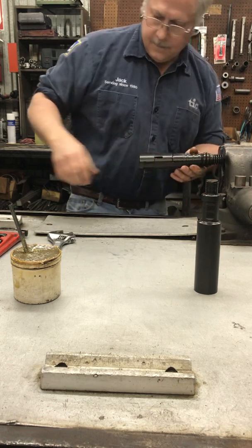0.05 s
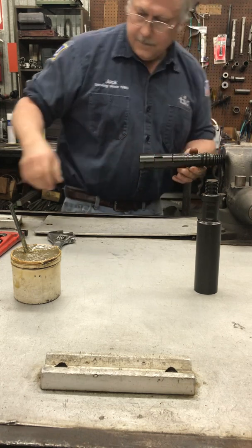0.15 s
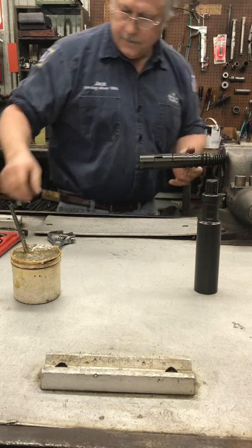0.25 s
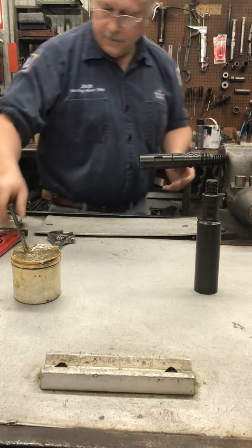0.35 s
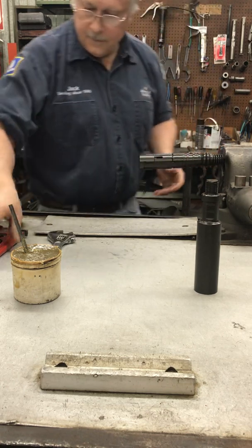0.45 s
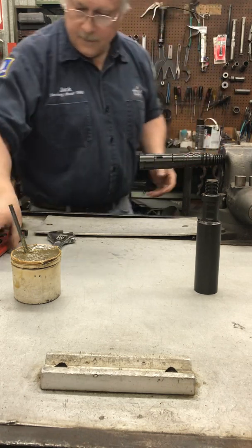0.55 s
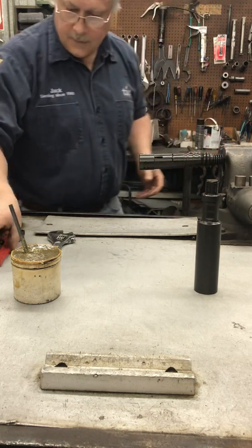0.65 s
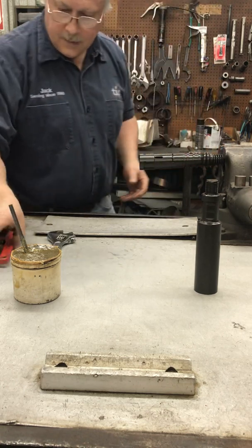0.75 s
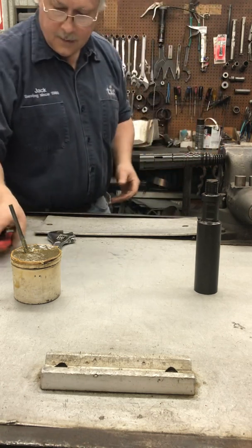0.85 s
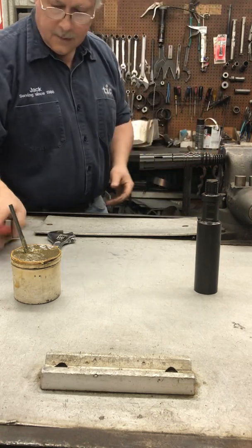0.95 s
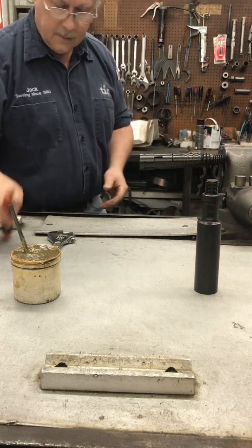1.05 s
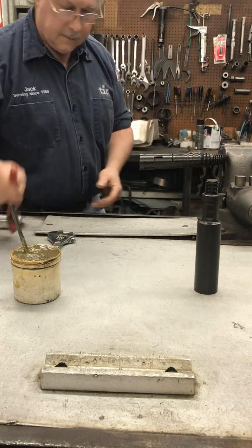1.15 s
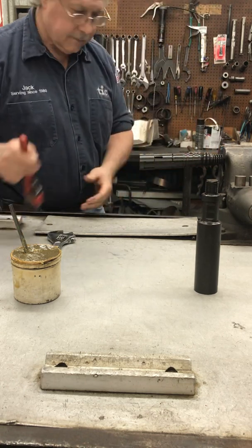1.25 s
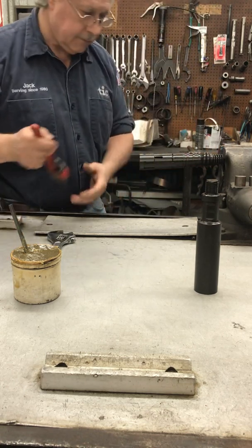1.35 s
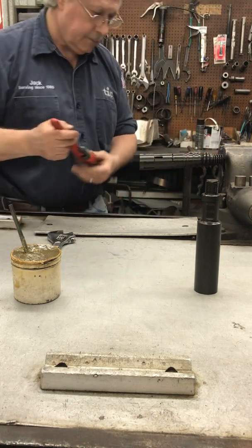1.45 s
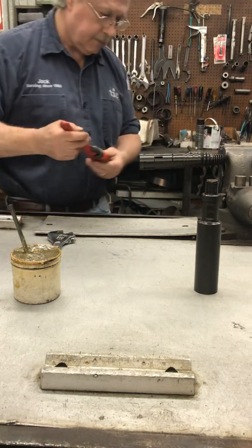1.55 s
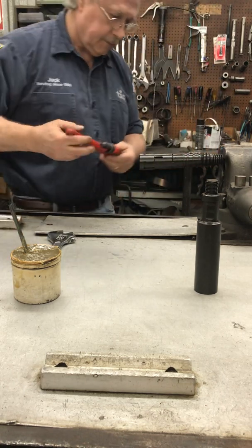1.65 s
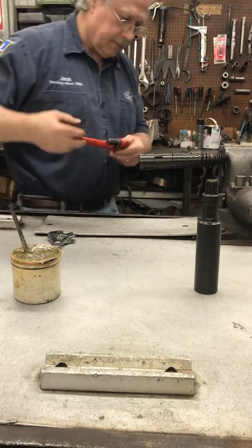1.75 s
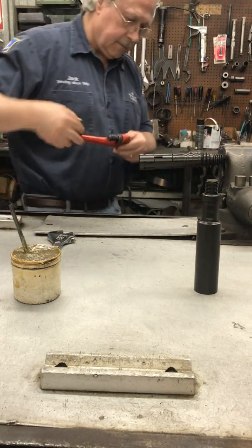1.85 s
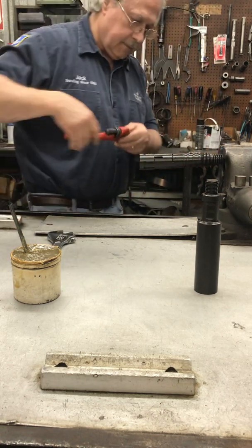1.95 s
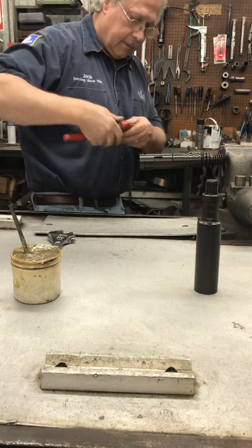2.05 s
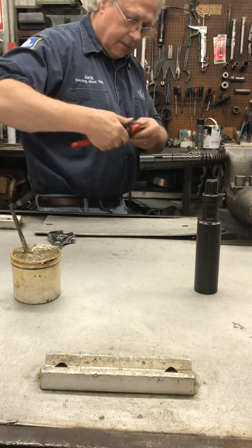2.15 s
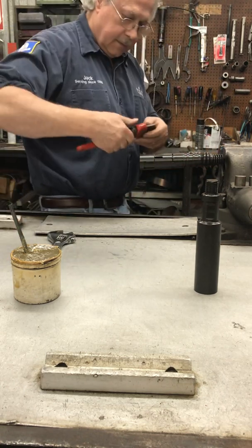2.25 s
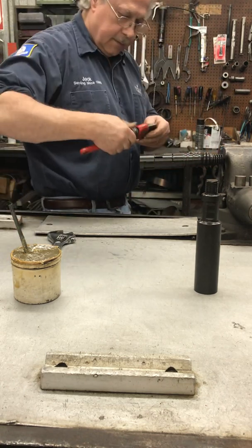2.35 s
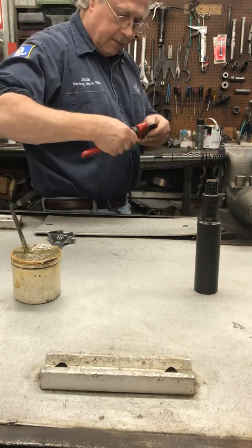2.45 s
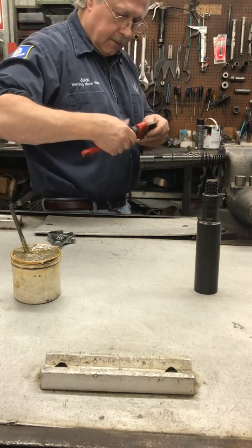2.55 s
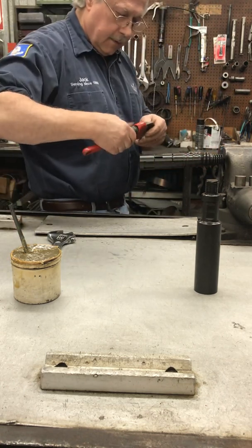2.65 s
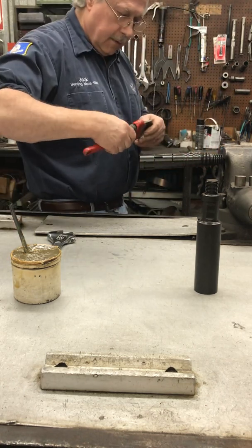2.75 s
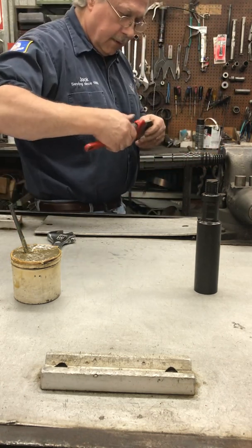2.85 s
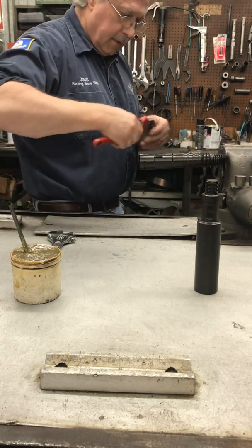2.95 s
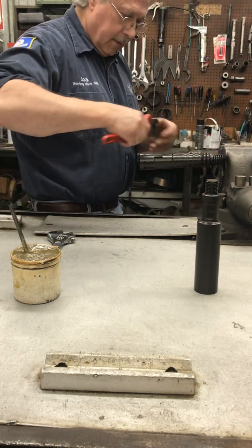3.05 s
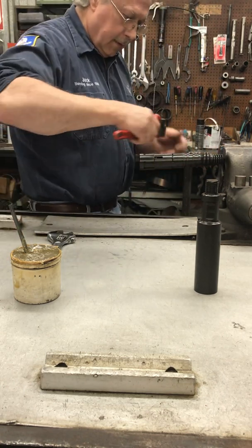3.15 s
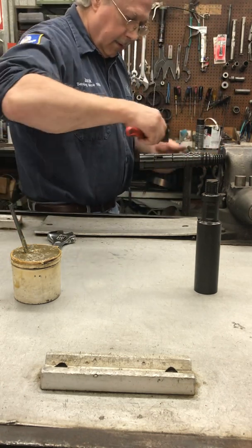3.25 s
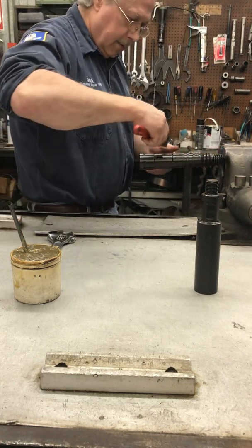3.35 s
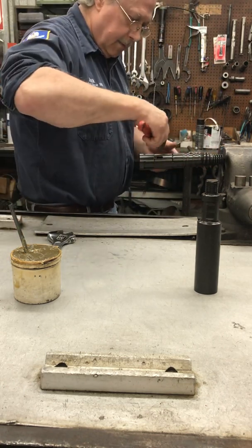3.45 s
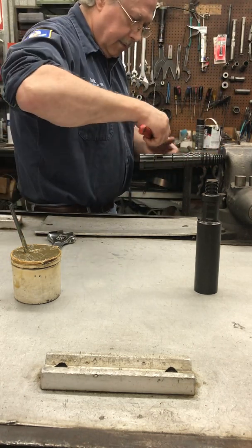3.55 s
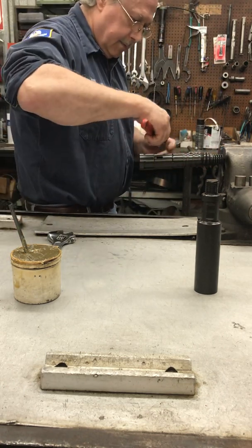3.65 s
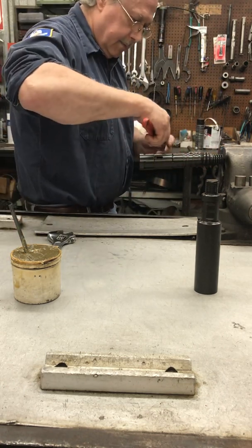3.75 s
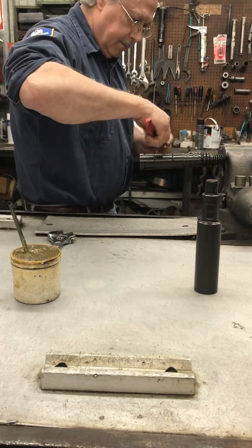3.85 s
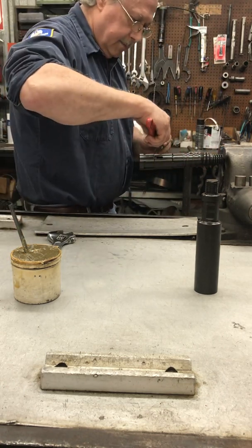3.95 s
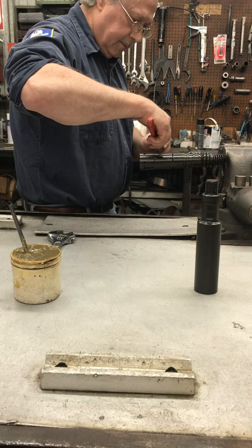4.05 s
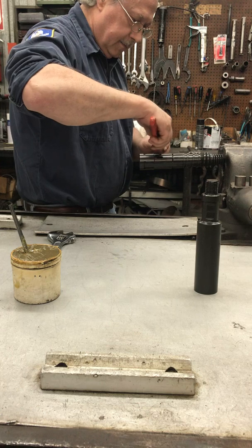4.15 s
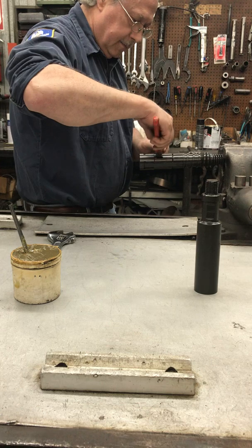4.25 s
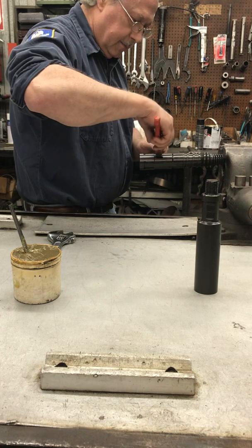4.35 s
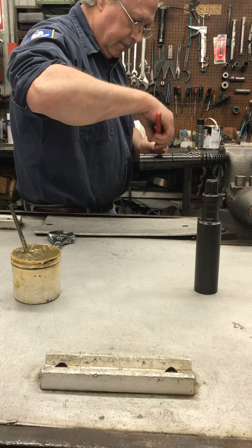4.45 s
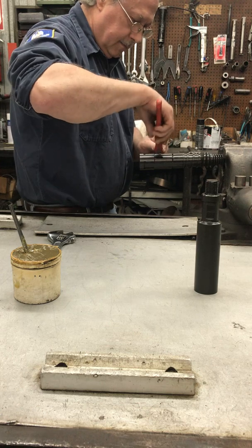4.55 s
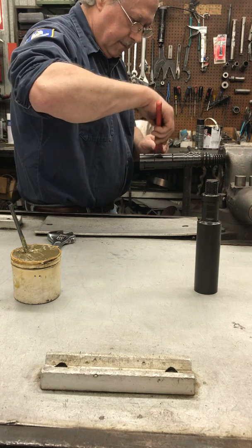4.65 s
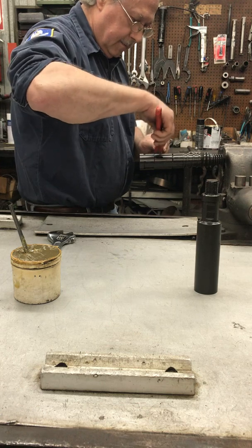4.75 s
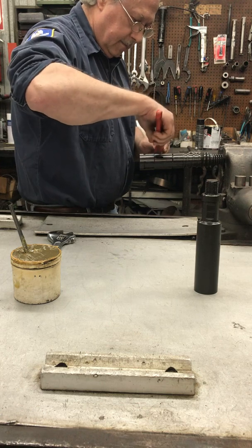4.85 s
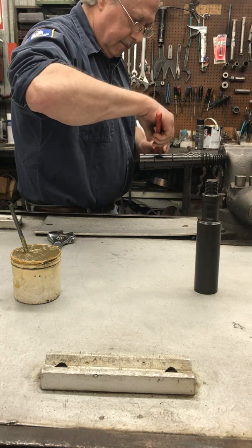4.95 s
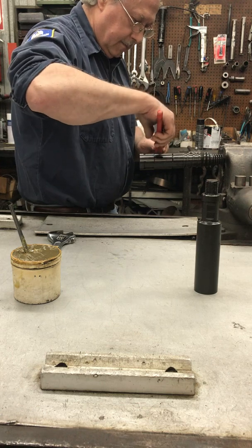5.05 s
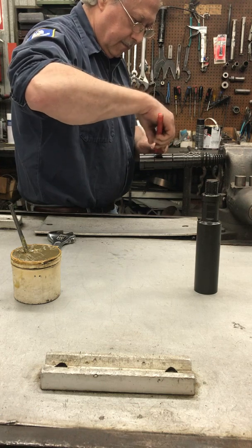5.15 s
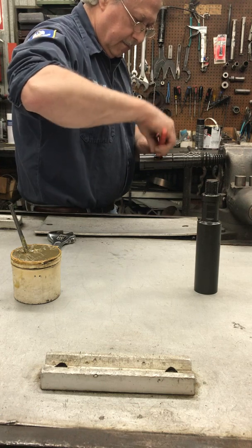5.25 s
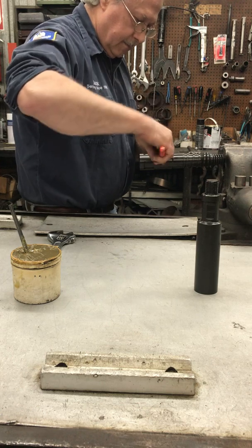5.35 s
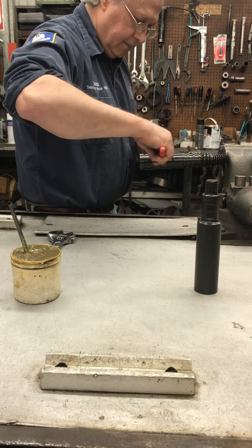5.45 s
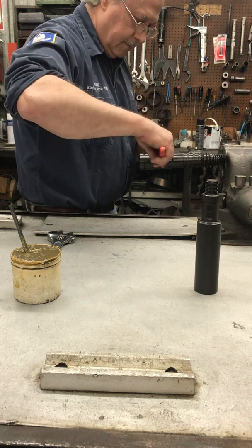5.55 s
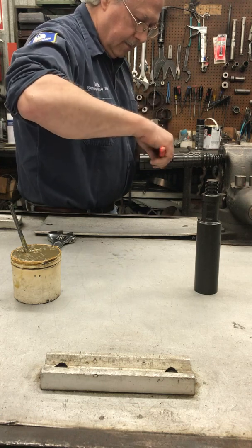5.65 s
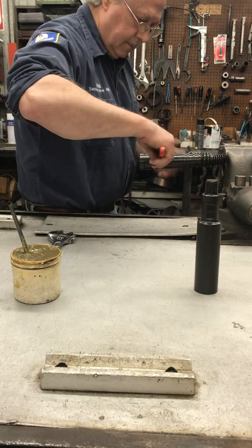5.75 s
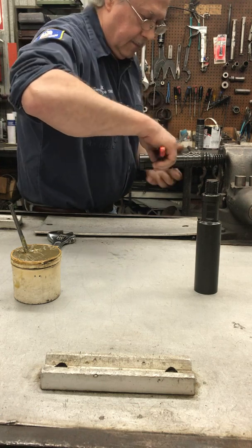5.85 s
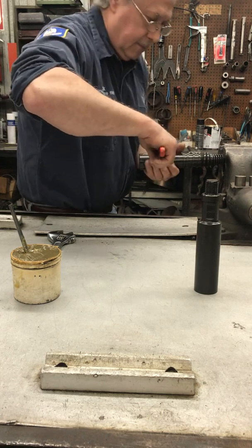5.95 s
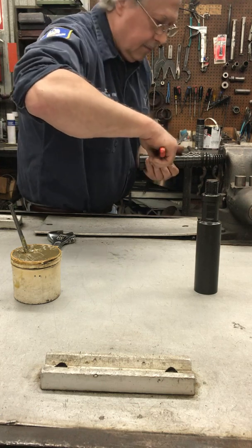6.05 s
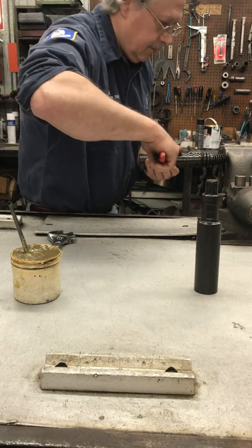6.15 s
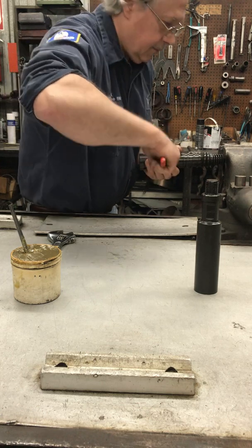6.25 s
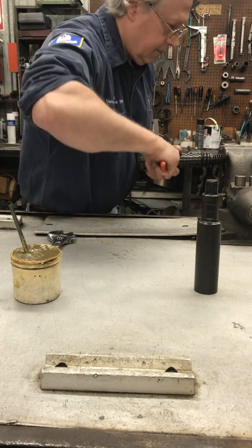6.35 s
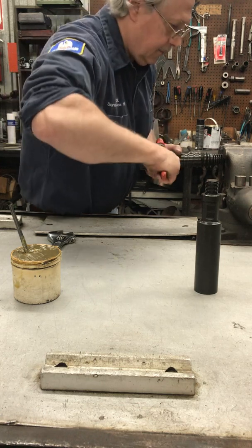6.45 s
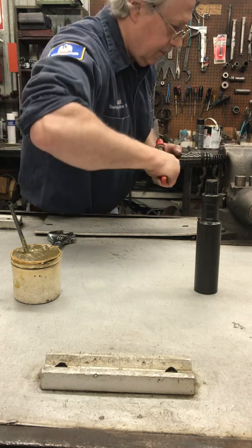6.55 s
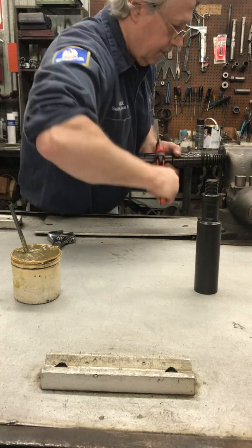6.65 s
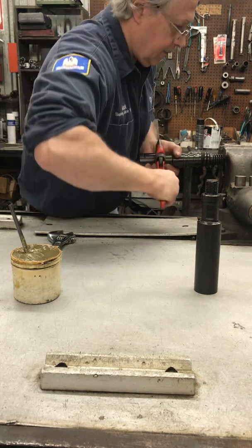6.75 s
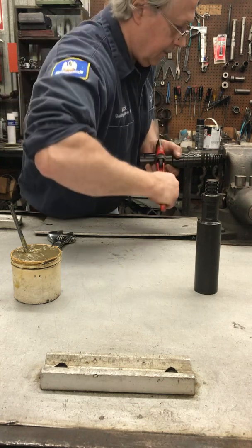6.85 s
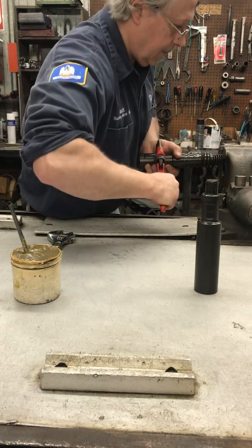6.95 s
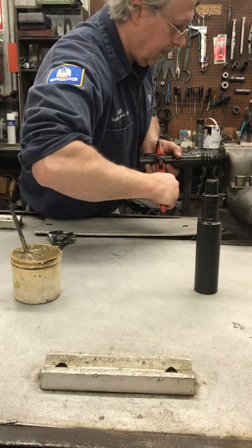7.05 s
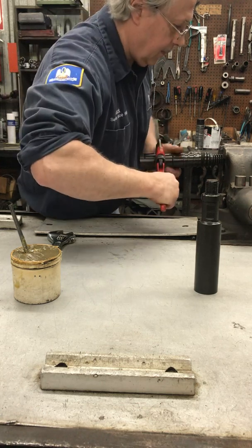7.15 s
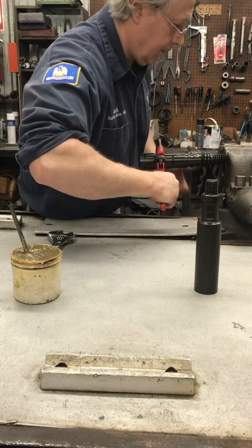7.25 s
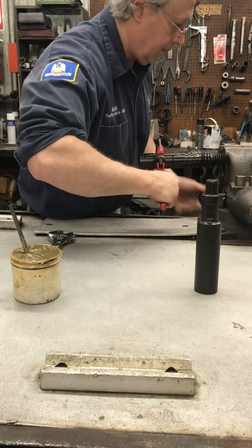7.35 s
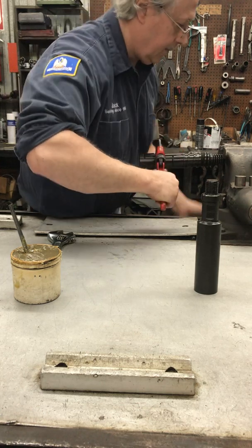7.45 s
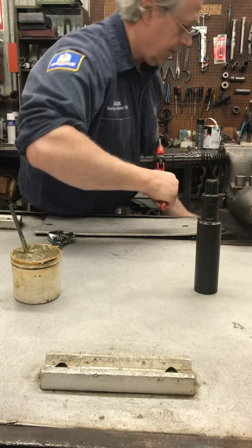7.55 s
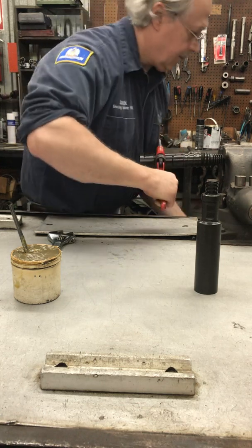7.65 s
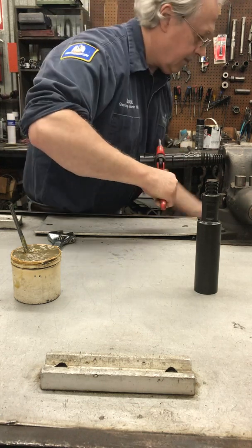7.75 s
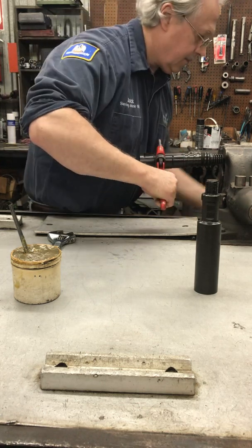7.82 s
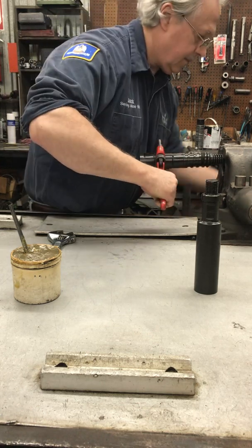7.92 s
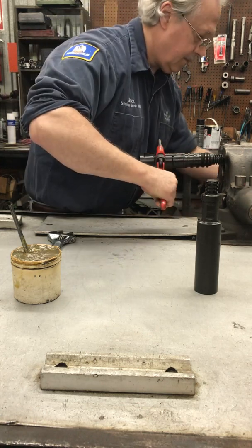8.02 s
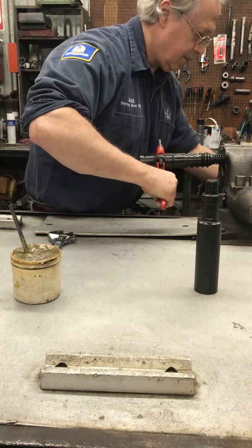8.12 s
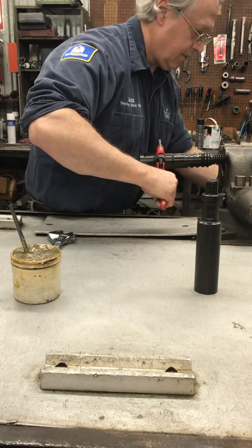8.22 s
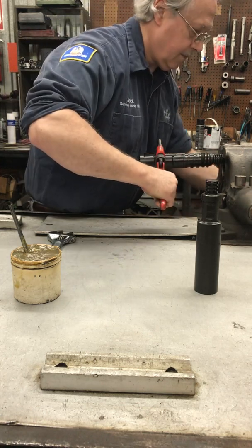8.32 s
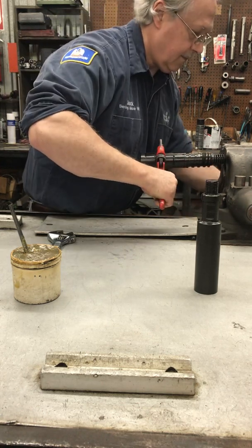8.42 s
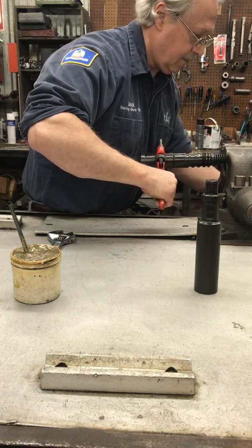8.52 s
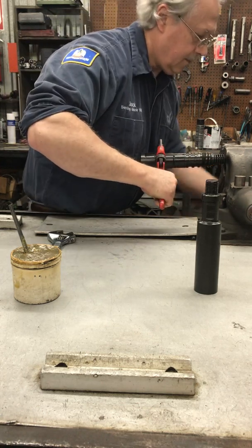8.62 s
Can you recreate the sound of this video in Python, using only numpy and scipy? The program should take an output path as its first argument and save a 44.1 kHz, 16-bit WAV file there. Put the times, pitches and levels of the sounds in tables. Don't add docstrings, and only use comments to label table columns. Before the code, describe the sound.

Close in a humming workshop, a heavy tool scrapes off a steel-topped bench with two clattering bangs, the second loudest. Loose metal clacks right after, then small bright clinks and muffled handling bumps come in uneven groups as the wrench meets a held pipe. The jaw bites with a short damped crack, then near silence but for fan rumble, faint rapid ticking and a soft bench thud. Short, faint room echo.

```python
import sys
import numpy as np
from scipy import signal
from scipy.fft import rfft, irfft
from scipy.io import wavfile
from scipy.ndimage import uniform_filter1d

SR = 44100
rng = np.random.default_rng(int(sys.argv[2]) if len(sys.argv) > 2 else 0)


def voltage_ratio(decibels):
    exponent = np.asarray(decibels, float) / 20
    return 10 ** exponent


def generate_wav(sig):
    pcm = np.round(np.clip(np.atleast_2d(sig).T, -1, 1) * 32767).astype(np.int16)
    wavfile.write(sys.argv[1], SR, pcm)


N = 382788

# pitch_hz, level_db, width_hz
HUM = [(57.8, -45.5, 5), (115.7, -50.5, 9.2), (207.2, -53, 4.6), (357, -66.5, 1.4), (1364, -72, 1.5),
       (1055, -75, 9.7)]
# pitch_hz, level_db (per Hz)
RUMBLE = [(20, -27.5), (38, -12.5), (52, 1), (62, -0.5), (86, -3), (125, -5), (178, -12.5), (209, -6),
          (238, -15.5), (319, -23), (350, -21), (468, -31), (520, -46.5), (680, -58), (1140, -120)]
# pitch_hz, level_db (per Hz)
HISS = [(260, -28), (450, -16), (515, -0.5), (748, -6.5), (1070, -9), (1150, -7.5), (1340, -6.5),
        (1860, -5.5), (2230, -13), (3140, -13.5), (4840, -20), (6730, -23), (10200, -35.5), (11300, -29),
        (16000, -33.5)]
# time_s, level_db
HISS_LEVEL = [(0, -55.5), (.45, -56.5), (1.6, -57), (5.5, -57.5), (8.68, -57)]

# pitch_hz, level_db, t60_s
FADING = [(2660, -48, 0.17), (3994, -51.5, 0.29), (4030, -54, 0.17), (4285, -59, 0.18), (5050, -65, .2),
          (1720, -55, .12), (5910, -64, .2)]
# pitch_hz, level_db, t60_s
PING = [(7100, -51, 0.13), (7090, -58.5, .14), (12830, -65.5, .08)]
PING_S = 0.639

# first_s, period_s
FAST_TIMES = (.0300, .050005)
SLOW_TIMES = (.0678, .102334)
# pitch_hz, level_db
FAST_TICK = [(4000, -22.5), (6200, 0), (7400, -17.5), (8800, -2.5), (10300, -18), (11700, 0),
             (13600, -14.5), (15000, -9.5)]
SLOW_TICK = [(1500, -30), (2900, 9.5), (3800, -4), (4900, -8), (6400, 5), (7600, -15.5), (9000, -16),
             (13000, -21), (15000, -12)]
SPARK = [(9000, -30), (13000, -12), (14500, 5), (16000, -6)]
SPARKS = [1, 2, 5, 13, 14, 16, 17, 19, 23, 25, 29, 31, 34, 35, 37, 38, 43, 45, 46, 48, 55, 58, 61, 63, 66,
          67, 69, 70, 72, 75, 79, 82, 83]

# start_s, level_db
DRY_CRACKS = [(0.302, -51), (1.0642, -44), (1.582, -45), (2.3890, -38.5), (2.423, -39), (2.907, -40),
              (3.523, -42), (4.143, -44), (4.765, -44), (4.788, -32), (4.8050, -19), (5.3120, -34),
              (5.3428, -27), (5.3525, -31), (5.4237, -39.5), (5.2964, -33), (5.9335, -49), (7.983, -45)]
# pitch_hz, level_db
CRACK_BODY = [(900, -18.5), (2020, -8.5), (2700, -5), (3300, 2.5), (4000, -8), (5200, -12), (6200, -35),
              (9000, -59.5)]
CRACK_TOP = [(3500, -36.5), (5500, 2), (7000, -0.5), (9000, -8), (12000, -12.5), (16000, -17.5)]
CRACK_TOP_DB = [-14, -20, -15, -21, -15, -16, -11, -11.5]
HARDER = 0.17

# peak_s, level_db, rise_s, fall_s, grit_db
DRAGS = [(0.503, -44, 0.008, 0.068, -7), (.526, -36, 0.03, 0.036, -20), (0.57, -42, .012, 0.21, -6),
         (0.636, -26, 0.008, 0.06, -14), (.622, -41, .05, .015, -4), (.900, -21, .004, 0.042, -19),
         (.915, -39, .006, 0.25, -17), (0.999, -46, .01, 0.023, -15), (1.066, -39.5, 0.025, 0.039, -15),
         (5.312, -45, 0.022, 0.042, -6), (5.352, -48, 0.017, 0.056, -18)]
# pitch_hz, level_db (per Hz)
RUB = [(250, -16), (400, -7.5), (620, -2), (1000, -5), (1900, -5), (2450, -11), (3300, -6), (4600, -4.5),
       (5400, -13), (6500, -27), (9500, -48)]
SLIP_SPREAD_DB, SLIPS_PER_S, RUB_SHARE = 2.5, 1800, 0.9
RUB_DAMP_S = 0.01
RUB_RING_DB = -14.5
SWELL_DB = 20

# start_s, level_db
SNAPS = [(.5103, -36.5), (.5150, -35), (.5200, -32.5), (0.525, -33), (0.5580, -25), (0.603, -28),
         (0.6276, -10), (0.8797, -1.5), (0.8863, 1), (.8884, -3), (.9990, -30), (1.057, -36), (1.0624, -34),
         (1.069, -34)]
# pitch_hz, level_db, t60_s
SNAP_MODES = [(2030, -6.5, 0.02), (3200, -8, 0.0078), (3900, -2, .009), (4180, 2, 0.0088),
              (4520, -1, 0.0065), (5150, -12, .006)]
# start_s, body_db, boom_db, edge_db
KNOCKS = [
    (0.559, -46, -46, -36),
    (0.605, -33.5, -31, -33.5),
    (.628, -20, -18, -24),
    (.637, -31, -20, -50),
    (.8803, -5.5, -16, -15),
    (.8815, -20, -6.5, -30),
    (0.8868, -8, -5.5, -12.5),
    (.8886, -13, -11, -17),
    (0.898, -19.5, -20.5, -42),
    (0.999, -26.5, -28, -35),
]
# pitch_hz, level_db (per Hz)
BENCH = [(250, -20), (390, -7), (500, -15.5), (615, 0), (760, -7.5), (960, -5.5), (1250, -7), (1580, -4.5),
         (2000, -4.5), (2300, -18.5), (3200, -4.5), (4100, -7), (4800, 0), (5800, -24), (9000, -55.5)]
# pitch_hz, t60_s
BENCH_T60 = [(300, 0.23), (520, .09), (700, 0.069), (1100, 0.058), (2000, 0.05), (2600, 0.06), (6000, .02)]
# pitch_hz, level_db (above the rest)
BENCH_NOTES = [(621, 8), (857, 2.5), (973, 10), (1089, 14), (1191, 8.5), (1396, 10), (1590, 10),
               (1797, 5.5), (2024, 9.5), (3516, -1.5), (3850, 8), (3980, -4), (4115, 7.5), (4443, 4.5)]
CEILING = 0.95

# peak_s, level_db, rise_s, fall_s
BUMPS = [(.632, -38.5, 0.0318, 0.1), (2.089, -46.5, 0.013, 0.13), (4.203, -44, 0.0052, 0.045),
         (4.810, -53.5, 0.1, 0.24), (5.298, -40, 0.0093, 0.076), (5.350, -52, .03, 0.043),
         (5.930, -53, 0.046, .06), (8.241, -40.5, 0.039, 0.1), (8.320, -70, 0.075, 0.033),
         (8.386, -50, 0.025, 0.025), (8.679, -40.5, 0.012, .03)]
# pitch_hz, level_db
BUMP = [(150, -14), (280, 0), (700, -5.5), (1200, -7), (2000, -19), (3500, -27), (6000, -47)]

# start_s, crack_db, ring_db
ON_LOOSE = [
    (1.0934, -20, -50),
    (1.0964, -17, -42),
    (1.6092, -34, -67),
]
ON_SHANK = [
    (1.1044, -17.5, -31.5),
    (1.686, -24.5, -56.5),
    (3.4795, -40, -66),
    (3.5344, -57, -40),
    (3.5454, -55, -38.5),
    (3.7637, -35, -50),
    (3.7775, -20, -40),
]
ON_NUT = [
    (0.828, -37, -67.5),
    (2.3167, -38.5, -67),
    (2.3963, -53, -62),
    (2.7138, -17, -37),
    (2.7223, -19, -55),
]
ON_JAW = [
    (2.6888, -30, -59),
    (2.9538, -48, -62.5),
    (3.5161, -18.5, -44),
    (3.798, -55, -60),
    (3.851, -24, -48),
    (4.606, -36.5, -65),
    (4.834, -55, -57),
]
ON_PIPE = [
    (2.9583, -31, -60),
    (3.8634, -46, -61),
    (4.2013, -44, -45),
    (4.7971, -26, -38),
    (4.8108, -20.5, -38),
    (4.8295, -55, -38.5),
    (4.977, -57, -67),
    (8.6135, -55, -63.5),
]
ON_THREAD = [
    (2.6890, -60, -57),
    (3.481, -60, -63),
    (4.798, -60, -35),
    (4.8295, -60, -43),
]
ON_HEAD = [
    (.8860, -26.5, -35.5),
    (0.889, -21, -33.5),
    (.8960, -32.5, -59),
    (0.911, -35.5, -70),
]
# jaw_db, hook_db, shank_db, nut_db, heel_db, pipe_db, collar_db, thread_db,
# pin_db, tooth_db, rivet_db, cap_db, web_db
SHARES = [
    (6, 8, 0, -30, -6, -19, -24, -18, 2, -17, -15, -9, -5),
    (-15, -22, -5.5, -21.5, -35, -13, -19, -26, -11, -26, -30, -23, -2),
    (-14, -0.5, -15.5, 0.5, -28, -23, -9, -18, -22, -31.5, -4, -15, -12),
    (7, -25, -8.5, -19, -29, -10, -3, -22, -14, -27, -20, -25, -8),
    (-27, -25, -29, -42, -40, 4, -11, -41.5, -30, -38, -35, -35, -25),
    (-22, -18, -20, -30, -32, -12, -8.5, -0.5, -20, -32.5, -22, -13.5, -20),
    (-8, -5, -4, -22, -32, -17.5, -16.5, -17, -8, -29, -15, -22, -15),
]
# pitch_hz, level_db, t60_s
WRENCH = [
    [(3338, 0, .42), (3322, -6, .4), (3400, -8, .2), (3260, -9, .25), (3128, -10, .3)],
    [(3488, 3, .19), (3520, -8, .2), (3600, -8, .1)],
    [(6998, 0, .35), (7020, -5, .3), (7080, -6, .2), (7290, -9, .2)],
    [(8452, -1, .4), (8482, -4, .35), (8420, -10, .15)],
    [(9990, -1, .3), (10040, -6, .2), (5373, 1, .2), (5560, 0, .15), (5722, 3, .17), (5790, -2, .15)],
]
# pitch_hz, level_db, t60_s
PIPE = [
    [(2649, 0, .24)],
    [(1990, 0, .14), (1510, -8, .08)],
    [(4850, 0, .42), (4580, -12, .1), (4926, -12, .2)],
    [(6548, 0, .1), (6618, -9, .4)],
    [(12830, 0, .13)],
    [(3784, 0, .4), (3704, -2, .2), (3924, -6, .25)],
    [(8560, 0, .35), (8610, -8, .15)],
    [(2860, 0, .05), (3030, -4, .06)],
]
FREE_DB = [-10, -10, -9, -11, -12, -13, -15, -14, -10, -11, -12, -13, -10]
GRIP_S = 0.0152
RING_LAG_S, FLUTTER_DB = 0.0015, 3.8
# pitch_hz, level_db
HAZE = [(1200, -32.5), (2500, -10.5), (3400, -2.5), (4500, -3.5), (5700, -6), (7000, -0.5), (8000, -16),
        (13000, -24), (16000, -32)]
HAZE_DB = [-6, -9, -9.5, -10.5, -3, -8, -1]
HAZE_S = 0.054

# start_s, level_db
BITES = [
    (5.2967, -30),
    (5.297, -19.5),
    (5.3117, -33),
    (5.3322, -35.5),
    (5.409, -46),
]
# pitch_hz, level_db, t60_s
BITTEN = [(2110, -3.5, 0.034), (2330, 6, 0.013), (2667, 2.5, 0.044), (3290, -2, 0.013), (4340, -3, 0.017),
          (5300, -15, 0.046), (7170, -35, 0.092), (8240, -33, 0.036)]
# peak_s, level_db, rise_s, fall_s
THUD = (8.25, -47, 0.1, 0.5)
# pitch_hz, level_db
LEGS = [(70, -25), (130, 5), (280, -5), (500, -34), (2000, -90)]

# pitch_hz, t60_s
SHOP = [(300, 0.91), (1000, 0.52), (4000, 0.49), (10000, 0.66)]
# pitch_hz, level_db
BENCH_FAR = [(250, -4), (450, -4), (700, 0), (2000, 0.5), (2700, 6), (3500, 3), (4300, -6), (5500, 4),
             (7000, 4)]
# pitch_hz, level_db
CAPSULE = [(30, -4), (45, 1), (4500, -0.5), (4900, -3), (7400, -0.5), (7900, -1.5), (9500, 1.5),
           (10350, -4), (11000, -1.5), (13000, -1.5), (13700, -4), (14400, 1)]
# pitch_hz, level_db
EDGE = [(15780, 0), (15860, -70)]


def evened(x):
    return x / np.sqrt(np.mean(x ** 2) + 1e-20)


def noise():
    return rng.standard_normal(N)


def read(points, hz):
    f, value = np.transpose(points)
    return np.interp(np.log(hz + 1), np.log(f + 1), value)


def coloured(x, points):
    return irfft(rfft(x) * voltage_ratio(read(points, np.fft.rfftfreq(len(x), 1 / SR))), len(x))


def causal(points):
    hz = abs(np.fft.fftfreq(4096, 1 / SR))
    log_gain = np.log(voltage_ratio(np.maximum(read(points, hz), -100)))
    taps = np.fft.ifft(np.exp(log_gain - 1j * signal.hilbert(log_gain).imag)).real[:1024]
    return taps / np.linalg.norm(taps)


def through(x, response):
    return signal.oaconvolve(x, response)[:N]


def ring(modes, length=.45):
    t = np.arange(int(length * SR)) / SR
    return sum(voltage_ratio(db - 60 * t / t60) * np.sin(2 * np.pi * hz * t) for hz, db, t60 in modes)


def soft_start(length, rise_s):
    return 1 - np.exp(-np.arange(length) / SR / rise_s)


def impulses(times, levels_db):
    out = np.zeros(N)
    np.add.at(out, np.round(times * SR).astype(int), voltage_ratio(levels_db) * rng.choice([-1., 1.], len(times)))
    return out


def blows(times, levels_db, contact_s, chatter_db=-100, chatter_s=.01):
    size = 3000
    out, t = np.zeros(N + size), np.arange(size) / SR
    shape = np.exp(-t / contact_s) + voltage_ratio(chatter_db) * np.exp(-t / chatter_s)
    bursts = rng.standard_normal((len(times), size)) * shape
    for s, db, burst in zip(times, levels_db, bursts):
        out[round(s * SR):][:size] += voltage_ratio(db) * burst / np.linalg.norm(burst)
    return out[:N]


def swell(peak_s, level_db, rise_s, fall_s):
    t = np.arange(N) / SR - peak_s
    away = np.minimum(np.where(t < 0, -t / rise_s, t / fall_s), 10)
    not_yet = t < -1.5 * rise_s
    return voltage_ratio(level_db - SWELL_DB * away - 100 * not_yet)


def spots():
    return [np.array(rows) for rows in (ON_LOOSE, ON_SHANK, ON_NUT, ON_JAW, ON_PIPE, ON_THREAD, ON_HEAD)]


def bench_bank(lo_hz, hi_hz):
    hz = np.linspace(250, 8000, 240) + 32 * rng.random(240)
    notes_hz, notes_db = np.transpose(BENCH_NOTES)
    hz = np.append(hz, notes_hz)
    band = 1 / np.sqrt((1 + (lo_hz / hz) ** 8) * (1 + (hz / hi_hz) ** 8))
    t = np.arange(3500)[:, None] / SR
    t60 = read(BENCH_T60, hz)
    heights = band * voltage_ratio(read(BENCH, hz) - 60 * t / t60) / np.sqrt(t60)
    heights *= rng.uniform(.6, 1.4, len(hz))
    heights[:, -len(BENCH_NOTES):] *= voltage_ratio(notes_db)
    heights *= (1 - np.exp(-t * hz * 2.25)) ** 2
    response = (heights * np.sin(2 * np.pi * (hz * t + .6 * rng.random(len(hz))))).sum(1)
    response = signal.lfilter(*signal.butter(6, 6000, fs=SR), response)
    return response / abs(response).max()


def hum():
    t, out = np.arange(N) / SR, np.zeros(N)
    for hz, db, width in HUM:
        r = np.exp(-np.pi * width / SR)
        drift = signal.lfilter([1], [1, -2 * r, r * r], noise() + 1j * noise())
        tone = (0.37 + drift / np.std(drift)) * np.exp(2j * np.pi * hz * t)
        out += voltage_ratio(db) * evened(tone.real)
    return out


def air():
    rumble = voltage_ratio(-39.5) * evened(coloured(noise(), RUMBLE))
    _, _, z = signal.stft(evened(coloured(noise(), HISS)), SR, nperseg=512)
    patches_db = uniform_filter1d(rng.standard_normal(z.shape), 5, 0)
    patches_db = evened(uniform_filter1d(patches_db, 20, 1))
    hiss = signal.istft(z * voltage_ratio(patches_db), SR, nperseg=512)[1][:N]
    return rumble + hiss * voltage_ratio(np.interp(np.arange(N) / SR, *np.transpose(HISS_LEVEL)))


def lingering():
    out, fading, ping = np.zeros(N), ring(FADING), ring(PING)
    out[:len(fading)] += fading
    out[round(PING_S * SR):][:len(ping)] += ping * soft_start(len(ping), .004)
    return out


def ticks(times, colour, level_db, spread_db, length_s):
    first_s, period_s = times
    s = np.arange(first_s, N / SR - .01, period_s)
    levels_db = level_db + spread_db * rng.standard_normal(len(s))
    return through(blows(s, levels_db, length_s), causal(colour))


def sparks():
    first_s, period_s = SLOW_TIMES
    s = first_s + period_s * np.array(SPARKS)
    return through(blows(s, np.full(len(s), -48.0), .0008), causal(SPARK))


def cracks():
    tables = spots() + [np.array(DRY_CRACKS)]
    s, body_db = np.concatenate([rows[:, :2] for rows in tables]).T
    top_db = body_db + HARDER * (body_db + 20)
    top_db = top_db + np.repeat(CRACK_TOP_DB, [len(rows) for rows in tables])
    body = through(blows(s, body_db + 9.0, 0.004, -42, 0.018), causal(CRACK_BODY))
    return body + through(blows(s, top_db + 9.5, 0.00287, -17.0, .02), causal(CRACK_TOP))


def drags():
    slip_db = SLIP_SPREAD_DB * np.minimum(rng.exponential(1, N), 3)
    slips = voltage_ratio(slip_db) * (rng.random(N) < SLIPS_PER_S / SR) * noise()
    drive = evened(evened(slips) + RUB_SHARE * noise())
    strokes = np.array([swell(*row[:4]) for row in DRAGS])
    grit = voltage_ratio(np.array(DRAGS)[:, 4]) @ strokes
    low, high = bench_bank(0, 2300), bench_bank(2300, SR)
    out = np.zeros(N)
    for level, bank, kind in ((strokes.sum(0), low, "low"), (grit, high, "high")):
        modes = bank[:1024] * np.exp(-np.arange(1024) / SR / RUB_DAMP_S)
        smooth = signal.lfilter(*signal.butter(4, 2300, kind, fs=SR), causal(RUB))
        body = evened(smooth) + voltage_ratio(RUB_RING_DB) * evened(modes)
        out += through(level * drive, body / np.linalg.norm(body))
    return out


def snaps():
    s, db = np.transpose(SNAPS)
    body = ring(SNAP_MODES, length=.04)
    body = body * soft_start(len(body), .0003) ** 2
    return through(impulses(s, db + 1.0), body)


def knocks():
    s, *levels = np.transpose(KNOCKS)
    banks = bench_bank(1200, 2500), bench_bank(0, 1200), bench_bank(2500, SR)
    return sum(through(-abs(impulses(s, db)), bank) for db, bank in zip(levels, banks))


def hardest(x):
    return signal.lfilter(*signal.butter(6, 6800, fs=SR), CEILING * np.tanh(x / CEILING))


def bumps():
    level = sum(swell(*row) for row in BUMPS)
    lumps = voltage_ratio(4.8 * evened(uniform_filter1d(noise(), 200)))
    return through(level * evened(lumps * noise()), causal(BUMP))


def chimes():
    s = np.concatenate(spots())[:, 0] + RING_LAG_S
    levels = np.concatenate([rows[:, 2:] + np.array(share) for rows, share in zip(spots(), SHARES)]).T
    out, t = np.zeros(N), np.arange(int(.45 * SR)) / SR
    for db, part, free in zip(levels + 4.0, WRENCH + PIPE, voltage_ratio(FREE_DB)):
        grip = free + (1 - free) * np.exp(-t / GRIP_S)
        body = soft_start(len(t), 0.0016) * grip * ring(part)
        wobble = uniform_filter1d(uniform_filter1d(noise(), 280), 280)
        out += voltage_ratio(FLUTTER_DB * evened(wobble)) * through(impulses(s, db), body)
    return out


def haze():
    s, crack_db = np.concatenate([rows[:, :2] for rows in spots()]).T
    db = crack_db + np.repeat(HAZE_DB, [len(rows) for rows in spots()])
    decay = np.exp(-2 * np.arange(SR // 4) / SR / HAZE_S)
    power = through(abs(impulses(s, 2 * db)), decay / decay.sum())
    return np.sqrt(abs(power)) * through(noise(), causal(HAZE)) * voltage_ratio(6.0)


def bite():
    s, db = np.transpose(BITES)
    body = ring(BITTEN)
    body = body * soft_start(len(body), .0003)
    return through(impulses(s, db - 6.5) + blows(s, db - 17, 0.0052), body)


def thud():
    return swell(*THUD) * evened(coloured(noise(), LEGS))


def shop(x):
    taps = np.zeros(SR)
    at = np.arange(200, SR - 20, 20)
    taps[at + rng.integers(0, 20, len(at))] = rng.choice([-1., 1.], len(at))
    hz, t, z = signal.stft(taps, SR, nperseg=256)
    tail = signal.istft(z * voltage_ratio(-60 * t / read(SHOP, hz)[:, None]), SR, nperseg=256)[1]
    return through(x, tail / np.linalg.norm(tail))


def scene():
    bench = hardest(knocks() + snaps()) + drags() + bumps() + thud()
    wrench = cracks() + haze() + lingering()
    jaw, parts = bite(), chimes()
    sent = voltage_ratio(-15.0) * coloured(bench, BENCH_FAR) + voltage_ratio(-8.5) * wrench
    wet = shop(sent + voltage_ratio(-21) * jaw + voltage_ratio(-15) * parts)
    leak = ticks(SLOW_TIMES, SLOW_TICK, -34.5, 1.26, 0.00028)
    leak = leak + ticks(FAST_TIMES, FAST_TICK, -48.0, 1.5, 0.001) + sparks()
    return (bench + wrench + parts + jaw + wet + hum() + air() + leak)[None]


def band_limit(x):
    return signal.sosfilt(signal.butter(12, 16520, fs=SR, output="sos"), x)


def record(dry):
    heard = coloured(coloured(dry[0], CAPSULE), EDGE)
    mix = voltage_ratio(-0.5) * heard[None]
    return band_limit(mix)


dry = scene()
out = record(dry)
generate_wav(out)
```